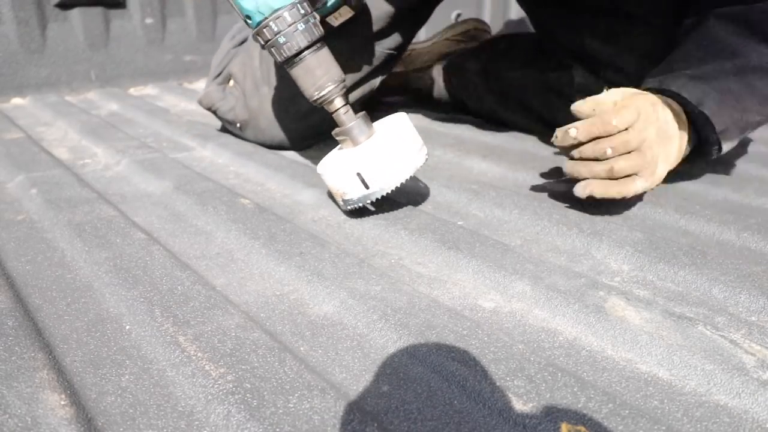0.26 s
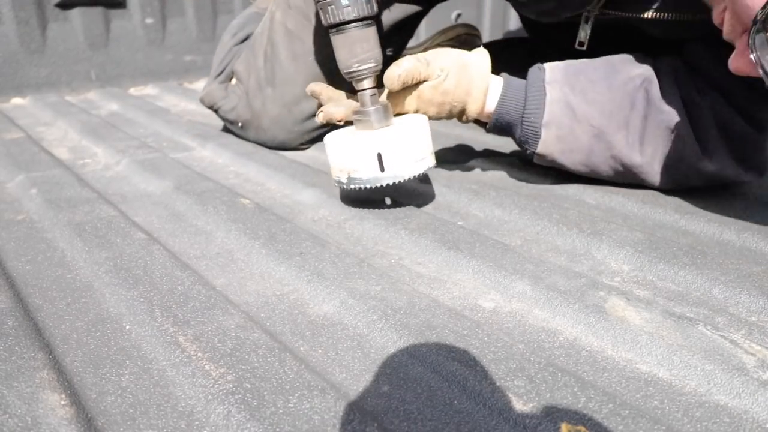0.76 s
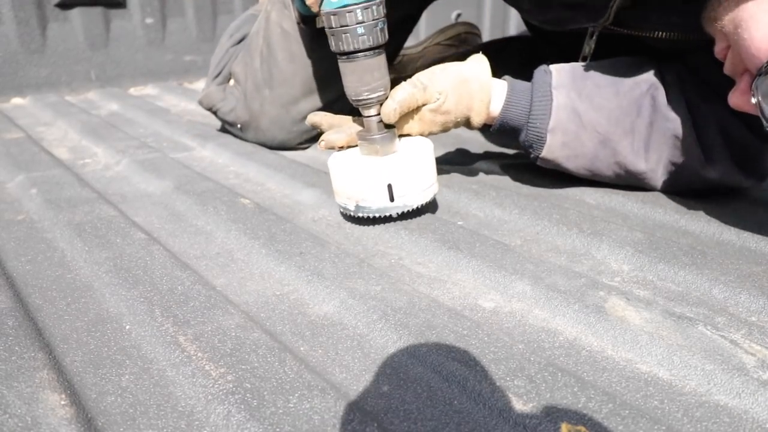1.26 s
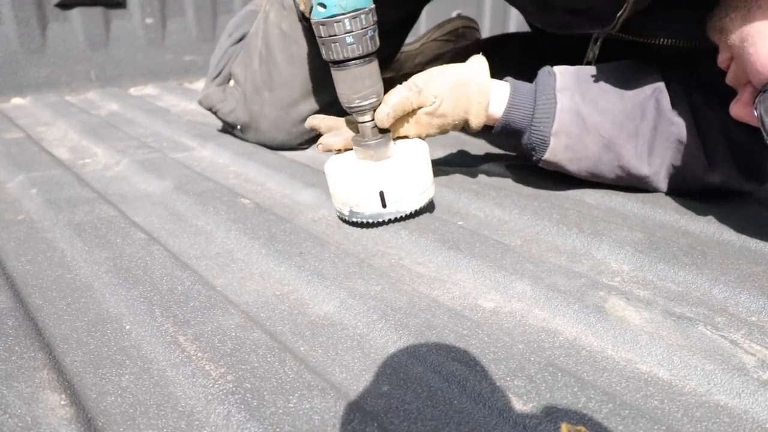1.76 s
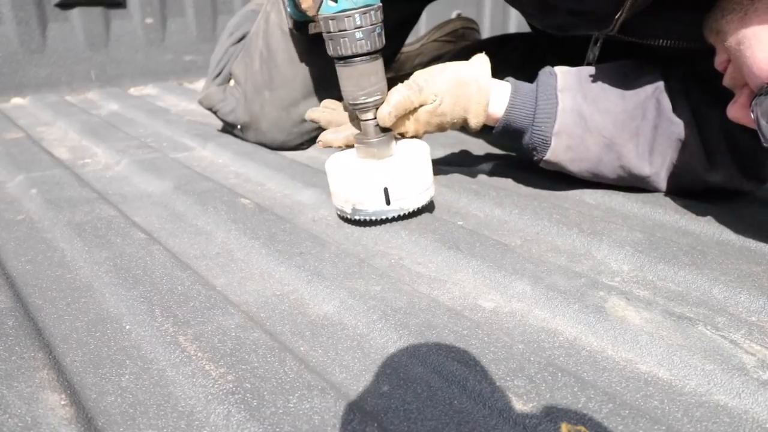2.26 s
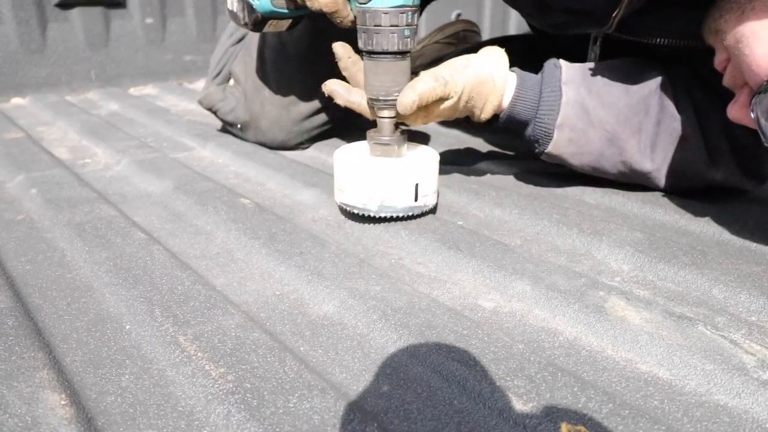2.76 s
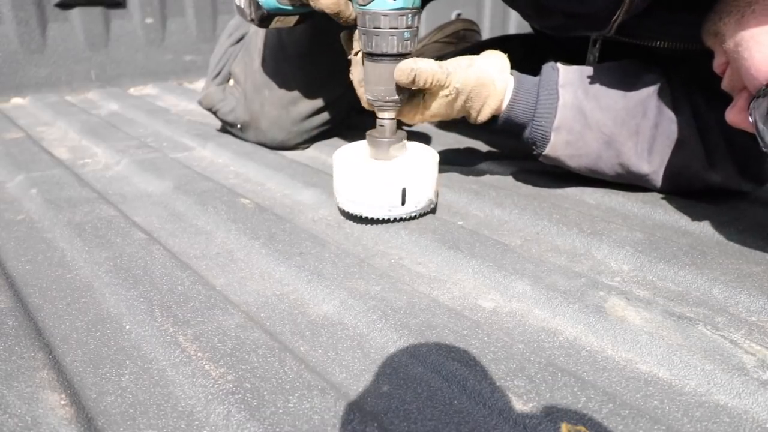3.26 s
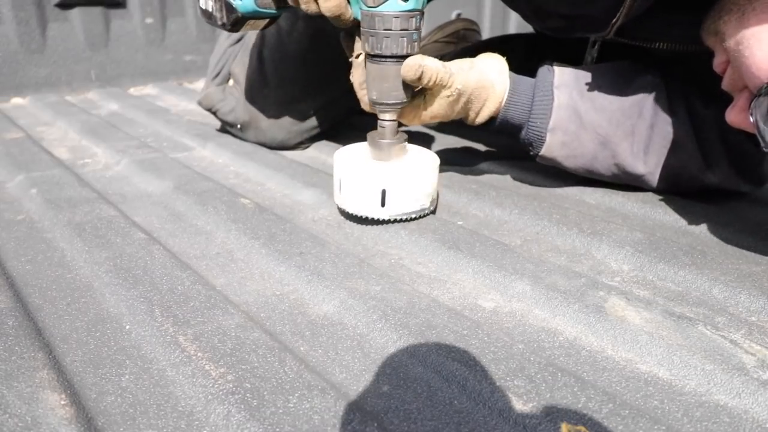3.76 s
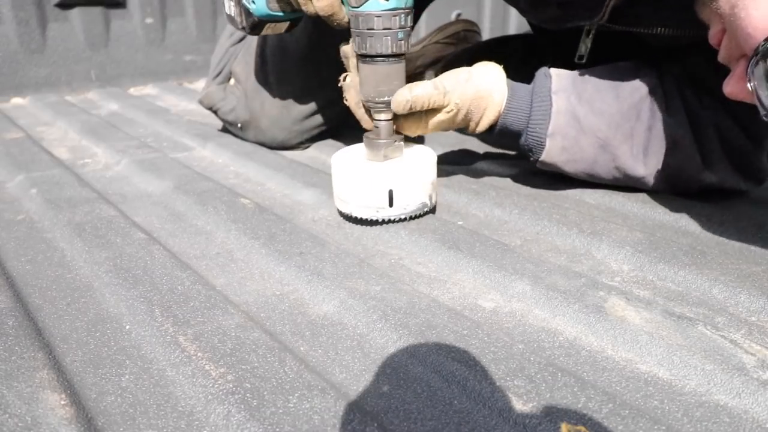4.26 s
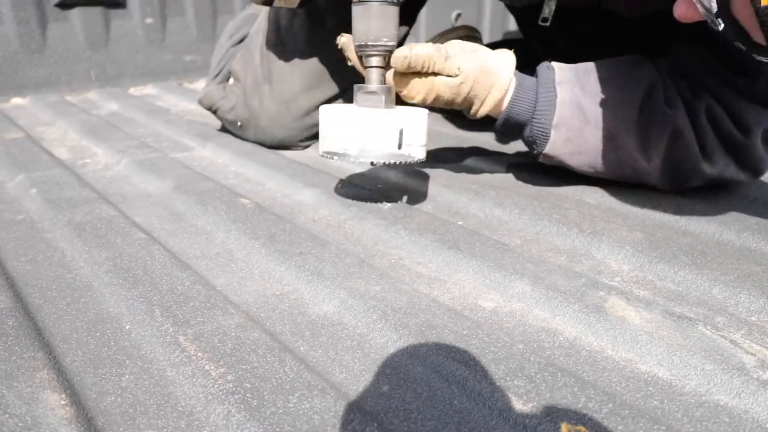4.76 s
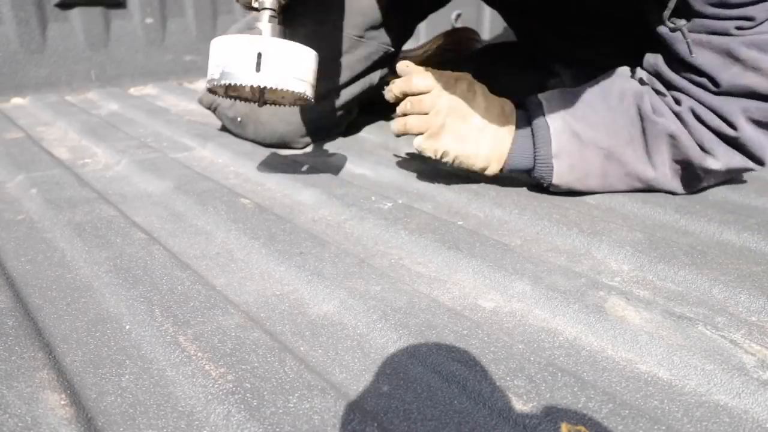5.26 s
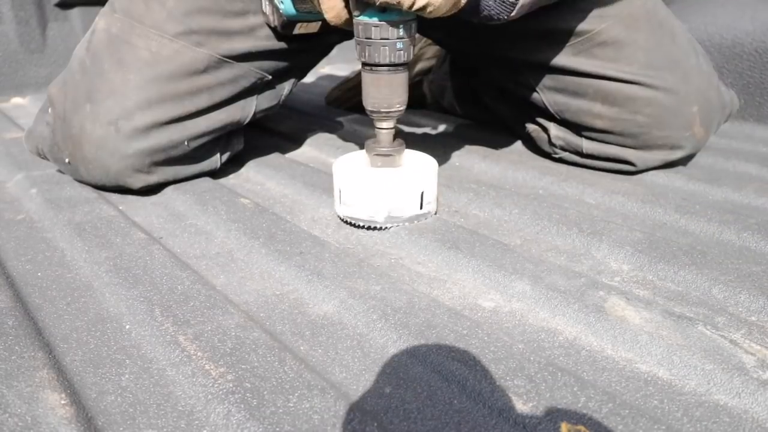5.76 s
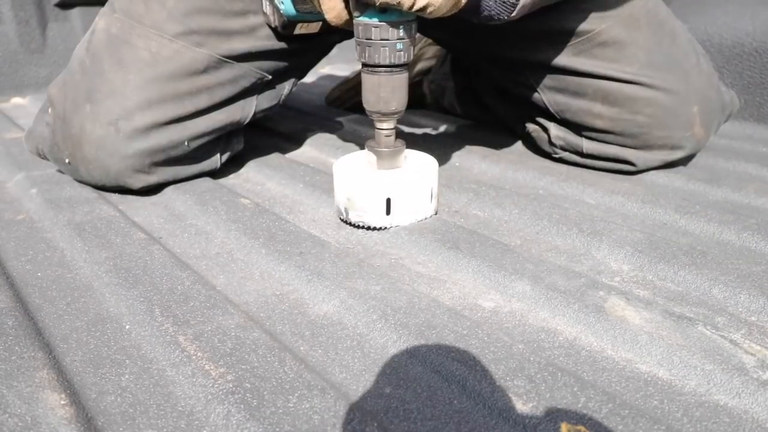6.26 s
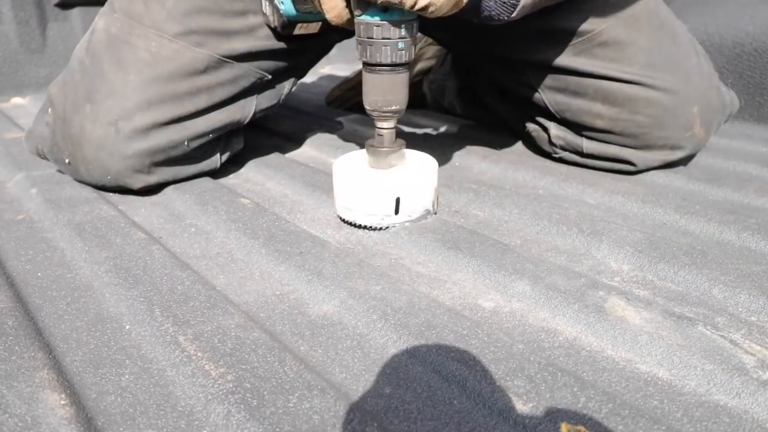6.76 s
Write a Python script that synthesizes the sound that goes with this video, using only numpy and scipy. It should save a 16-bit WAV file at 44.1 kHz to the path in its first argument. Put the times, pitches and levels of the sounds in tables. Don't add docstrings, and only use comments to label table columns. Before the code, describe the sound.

Cloth drags and knees thump on sheet metal outdoors, a drill whines in brief revs, then saw teeth scrape and drum the steel.

```python
import sys
import numpy as np
from scipy import signal
from scipy.fft import rfft, irfft
from scipy.io import wavfile
from scipy.ndimage import uniform_filter1d, minimum_filter1d

SR = 44100
rng = np.random.default_rng(int(sys.argv[2]) if len(sys.argv) > 2 else 0)


def gain_from_db(level_db):
    decades = np.asarray(level_db, float) / 20
    return 10 ** decades


def digitize_waveform(pressure):
    field = np.atleast_2d(pressure).T
    bounded = np.clip(field, -1, 1)
    quanta = np.round(bounded * 32767).astype(np.int16)
    wavfile.write(sys.argv[1], SR, quanta)


N = 308700
T = np.arange(N) / SR

# (frequency [Hz], likeness [0-1])
LIKENESS = [(60, 1), (300, 0.89), (700, 0.69), (1500, 0.28), (4000, 0.39), (9000, 0.21), (14000, 0.067)]
# (frequency [Hz], likeness [0-1])
FAR_LIKENESS = [(60, 1), (300, 0.95), (700, 0.63), (1500, 0.2), (3000, 0)]
# (frequency [Hz], difference [dB])
BALANCE = [(60, 0), (300, 0.5), (1200, -2), (4500, -1), (14000, -2.5)]

# (frequency [Hz], level [dB per Hz])
RUMBLE_COLOUR = [(15, -44), (25, -4.5), (69, -5), (200, -4.5), (273, -5), (425, -8), (578, -21.5),
                 (636, -15), (866, -22), (1180, -19.5), (2500, -30.5), (3250, -38), (5500, -120)]
# (time [s],
# level [dB])
BREEZE_LEVEL = [(0, -33.5), (.45, -30), (.62, -34), (.83, -31.5), (1.96, -32.5), (2.13, -29.5),
                (2.18, -36.5), (2.3, -36.5), (2.99, -32.5), (4.25, -29), (4.7, -30), (4.8, -45),
                (4.96, -45), (5.04, -33), (5.3, -35), (5.41, -31)]
# (frequency [Hz], level [dB per Hz])
CLOTH_COLOUR = [(880, -9), (1500, -8.5), (2080, -14.5), (2440, -12.5), (3220, -14.5), (4160, -17),
                (4870, -21.5), (8490, -20.5), (15100, -35), (16000, -27)]
# (time [s], level [dB])
CLOTH_LEVEL = [(0, -47), (.13, -49), (.5, -47), (.7, -47.5), (1.3, -52), (3, -51), (4.3, -52.5),
               (4.72, -49.5), (4.968, -55.5), (5.2, -50.5), (5.25, -42.5), (5.41, -38)]
# (time [s], peak [dB], brightness [dB], weight [dB])
CLOTH_DRAGS = [
    (0.033, -37, 5, 12),
    (0.201, -24.5, -9.5, 3),
    (0.309, -41.5, 8, -13),
    (0.365, -28.5, -8.5, 7),
    (.44, -53.5, 14.5, 1),
    (.73, -64, 7, 13),
    (3.21, -45.5, -16, 17.5),
]
# (time [s], peak [dB], pitch [Hz], time to fall 60 dB [s])
FLOOR_THUMPS = [(0.018, -8, 292, 0.12), (0.355, -1, 162, 0.037), (0.387, -4.5, 196, 0.1),
                (0.81, -2, 110, 0.023), (0.83, -14, 90, 0.034), (2.05, -13.5, 172, 0.063),
                (2.101, -2, 142, 0.014), (2.122, 11, 307, 0.013), (2.141, -4, 320, 0.016),
                (2.244, -14.5, 380, 0.058), (2.265, -6, 234, 0.024), (2.323, -17.5, 205, 0.066),
                (3.186, 1, 151, 0.026), (3.219, -6, 376, 0.045), (.003, -14, 230, .04),
                (.044, -15, 345, .05), (.432, -8, 200, 0.022), (3.567, -11.5, 151, 0.044),
                (4.385, -13, 152, 0.065), (4.498, -11, 110, 0.046), (4.542, -9.5, 323, 0.058),
                (4.644, -16, 109, .04)]
# (time [s], peak [dB], pitch [Hz], time to fall 60 dB [s])
SHEET_BOOMS = [(3.409, -10, 140, 0.055), (3.491, -11.5, 164, 0.092), (3.969, -7.5, 170, 0.042),
               (5.683, -9, 192, 0.056), (5.743, -3, 162, 0.057), (5.862, -19, 165, 0.046),
               (5.986, -6.5, 152, 0.079), (6.02, -6, 206, 0.11), (6.052, -19, 203, 0.066),
               (6.093, -10.5, 190, 0.054), (6.156, -1, 161, 0.044), (6.255, -6, 188, 0.076),
               (6.344, -3, 184, 0.12), (6.665, -15, 168, 0.058), (6.69, -9, 160, .05)]
# (time [s], peak [dB], centre [Hz], width
DRY_SNAPS = [(.004, -21, 9600, 0.9), (.0253, -20, 2200, 0.7), (0.15, -20, 3500, 2.4), (0.18, -19, 3000, 1),
             (0.3, -19.5, 4120, 0.19), (0.26, -24, 7500, 0.89), (5.443, -24, 2020, 2),
             (5.6838, -8, 1600, 1.8), (5.7434, -5, 2400, 3.4), (5.878, -12, 1500, 2.2),
             (5.925, -12, 1300, 1.8), (6.055, -21, 1500, 1.8), (6.1198, -5, 3200, 2.5),
             (6.351, -9, 2500, 3.3), (6.4036, -12, 2500, 2), (6.4924, -11, 2480, 1.5),
             (6.646, -23, 1800, 1.5), (6.7722, -10, 2500, 1.8), (6.921, -9.5, 3000, 2.4),
             (4.864, -10, 7000, .8), (4.878, -27, 4000, 2), (4.8868, 4.5, 6500, 0.17),
             (4.833, -14, 3100, .1), (5.979, -16, 2200, 1), (6.872, -12, 3000, 2.1), (6.1645, -12, 1500, 1),
             (6.712, -6, 4600, 2), (5.754, -13, 2500, 3), (5.614, -15, 2000, 2), (6.6, -14, 4000, 2),
             (4.86, -12, 3800, .3), (3.021, -21, 4900, 2), (6.5505, -5, 10500, .5), (6.548, -17, 2000, 2),
             (6.499, -13, 2000, .6), (6.676, -14, 2200, .8), (3.09, -20, 2700, .4), (4.887, -6, 9600, .3)]

# (frequency [Hz], level [dB], time to fall 60 dB [s])
CUP_HIGH_MODES = [(9430, -10, .05), (9440, 2.5, 0.053), (9760, -2, 0.033), (10040, -8, 0.052),
                  (11000, 0.5, 0.027), (11500, 0.5, 0.024), (12300, -11, .035), (12250, -4, 0.039)]
# (frequency [Hz], level [dB], time to fall 60 dB [s])
CUP_MID_MODES = [(6080, -14, .02), (7030, 0, .022), (7130, -4, .05), (7840, -15, .03)]
# (frequency [Hz], level [dB], time to fall 60 dB [s])
CUP_LOW_MODES = [(1400, -8, .012), (2150, -8, .01), (2660, 0, .011), (3345, -4, .015), (4050, -7, .012),
                 (4620, -16, .03)]
# (time [s], peak [dB], middle modes [dB], low modes [dB], upper rim modes [dB])
CHUCK_CLACKS = [(3.021, -46, 26, 11, 0), (3.0897, -19, 4.5, 11.5, -2), (4.1746, -18, 6.5, 7, -2),
                (4.35, -39, 6, 17, 0), (4.5319, -13.5, -10, 8, -5), (4.5366, -12, 1.5, -15, 0),
                (4.573, -39.5, 0, 18, 0), (4.588, -33.5, 5, 7, -3), (4.605, -44, 6, 12, 0),
                (4.639, -55, 21, -6, 0), (4.7485, 3, -11, -20, 13), (4.8586, -4.5, -5, -3.5, 4),
                (4.8864, 3, -3, -25, 2), (4.936, -36, 2, 13, 0), (5.0314, -43.5, -2, 15, 2)]
# (time [s], peak [dB], middle modes [dB], upper rim modes [dB])
CUP_CHATTER = [(5.415, -15, 2, -5), (5.682, -31, -4, 0), (5.8671, -29, 1, 0), (5.883, -9, -7, 0),
               (5.924, -18, 1, 0), (5.9633, -16, -5, 0), (6.052, -18, -9, 0), (6.062, -8, -13, 3),
               (6.1195, -3.5, -5, 1), (6.1409, -0.5, -10, -3), (6.1642, 6.5, -13.5, 11),
               (6.2008, -7, -15, 7), (6.352, -15, 5, 0), (6.378, -4.5, -15, 6), (6.4, -9, -15, 0),
               (6.471, -6, -8, 7), (6.505, -9, 1, -3), (6.513, -2, -18, -4), (6.5224, -4, -18, -8),
               (6.5474, 8, -12, 1), (6.606, -5.5, -18, 0), (6.6727, -28, -3, 0), (6.688, -12, -10, 0),
               (6.712, 9, -14, 3), (6.794, -1.5, -10, 5), (6.8104, -13, -14, 2), (6.8834, 0.5, -7.5, 4),
               (6.894, -13, -8, 0), (6.9214, -7.5, -14, -3)]

# (time [s], scrape level [dB])
PRESSURE = [
    (5.411, -25),
    (5.466, -22.5),
    (5.898, -26),
    (6.068, -24.5),
    (6.514, -26.5),
    (6.616, -25.5),
    (6.744, -27),
    (6.86, -33.5),
    (7.0, -33),
]
# (time [s], peak [dB])
TOOTH_GRABS = [(5.441, -8), (5.612, -7), (5.64, -0.5), (5.684, 6.5), (5.742, -11), (5.768, 0), (5.873, 5),
               (5.924, 0), (5.972, -12), (6.056, 2), (6.163, 1.5), (6.254, 3.5), (6.331, -6), (6.369, 2),
               (6.491, -27), (6.624, -21), (6.688, -3), (6.788, 1.5), (6.86, -5), (6.977, -10)]
# (frequency [Hz], level [dB per Hz])
DRUM_COLOUR = [(15, -54), (25, -68), (54, 8), (114, -1), (189, 3), (255, -3.5), (383, -6.5), (452, 2.5),
               (752, -27), (900, -5.5), (1170, -67), (1980, -120)]
# (frequency [Hz], width [Hz], boost [dB])
DRUM_PEAKS = [(64, 37, -2.5), (153.5, 10, 4), (201, 13.7, 10), (333, 7, 10), (439.7, 17.4, 8.5),
              (547.4, 18, 19), (629, 16, 22)]
# (frequency [Hz], level [dB per Hz])
SCRAPE_COLOUR = [(350, -4), (600, -12), (636, -3.5), (752, -5), (1060, -7), (1550, -1), (2070, -13.5),
                 (2800, -19), (3640, -51), (6160, -120)]
# (frequency [Hz], width [Hz], boost [dB])
SCRAPE_PEAKS = [(1053, 40, 14.5), (1250, 69, 6.5), (1420, 30, 6), (1584, 22, 8.5), (1844, 98, 5.5)]
# (frequency [Hz], level [dB per Hz])
LOADED_COLOUR = [(1180, -36), (2000, -4.5), (3520, -6.5), (4650, -12.5), (6140, -10.5), (8630, -14),
                 (9830, -12), (14200, -22.5), (16000, -29)]
# (frequency [Hz], width [Hz], boost [dB])
LOADED_PEAKS = [(3700, 690, 5), (6230, 410, 7), (7700, 290, 7), (9540, 470, 3.5)]
# (time [s], gear mesh [Hz])
LOADED_MESH = [(5.41, 2975), (5.6, 2990), (5.66, 2900), (5.72, 2860), (5.96, 2870), (6.1, 2820),
               (6.2, 2880), (6.32, 2890), (6.36, 3050), (6.37, 2980), (6.5, 2960), (6.56, 2880),
               (6.67, 2890), (6.75, 2840), (7, 2870)]
# (time [s], drop in mesh [Hz])
SPEED_SAGS = [(5.3, 0), (5.93, 90), (6.0, 30), (6.11, 80), (6.365, 230), (6.404, 220), (6.44, 200),
              (6.465, 90), (6.505, 210), (6.68, 180), (6.815, 70), (6.92, 60)]

# (time [s], motor level [dB])
TRIGGER_SQUEEZES = [
    [(3.021, -29), (3.15, -28), (3.29, -27.5), (3.39, -24.5), (3.71, -28), (3.8, -26), (3.84, -23.5),
     (3.98, -23.5)],
    [(3.981, -23), (4.04, -18), (4.12, -22), (4.168, -25.5), (4.195, -42)],
    [(4.35, -33), (4.47, -25), (4.53, -31.5)],
    [(4.735, -31), (4.75, -17), (4.78, -13.5), (4.84, -20.5), (4.858, -28), (4.868, -38), (4.886, -37)],
]
# (time [s], gear mesh [Hz])
SQUEEZE_MESH = [
    [(3.02, 700), (3.1, 1450), (3.2, 1730), (3.29, 1750), (3.39, 1935), (3.47, 1860), (3.55, 1570),
     (3.63, 1230), (3.8, 1070)],
    [(3.83, 1460), (3.99, 1420), (4.03, 2150), (4.06, 2720), (4.11, 3010), (4.18, 2700)],
    [(4.35, 600), (4.41, 1250), (4.45, 1580), (4.54, 1750)],
    [(4.735, 2100), (4.775, 2680), (4.79, 2770), (4.85, 2540), (4.872, 2450)],
]
# (time [s], whine level [dB])
GEAR_TORQUE = [(3.02, -6), (3.28, -5), (3.36, 1), (3.63, 4), (3.72, -1), (3.81, -4), (3.86, 0), (3.99, 0),
               (4.025, -6), (4.06, 1), (4.18, 0), (4.35, 0), (4.5, 2), (4.735, -9), (4.785, 0), (4.87, -3)]
# (multiple of the mesh [ratio], level [dB])
GEAR_ORDERS = [(1, -3), (2.035, -4), (3.06, -11), (.5, -6), (1.555, -10), (1.96, -7), (2.55, -8),
               (1.69, -10), (3.54, -10), (4.05, -9), (1.37, -10), (1.49, -9), (2.3, -9), (2.8, -8)]
# (frequency [Hz], gain [dB])
WHINE_COLOUR = [(500, -4), (1000, -2), (1250, 4), (1500, 1), (1900, 2), (2250, 7), (3000, 8), (4400, 4),
                (5200, 5), (5700, 5), (6200, 5), (6900, -5), (8500, -3), (10000, -14)]
# (frequency [Hz], level [dB per Hz])
MOTOR_COLOUR = [(410, -63), (700, -9.5), (2300, -5), (3200, 0.5), (3600, -5), (4430, 0.5), (5060, -11),
                (5990, 2.5), (6920, -7), (8420, -4), (16000, -26.5)]
# (frequency [Hz], width [Hz], boost [dB])
HOUSING_PEAKS = [(3175, 200, 8.5), (3950, 92, 7.5), (3970, 110, -2), (5920, 200, 4.5), (7900, 300, 5),
                 (8950, 140, -3)]


def evened(x):
    return x / np.sqrt(np.mean(x ** 2) + 1e-20)


def read(points, hz):
    f, value = np.transpose(points)
    return np.interp(np.log(hz + 1), np.log(f + 1), value)


def column(rows, index, edge_s=0.0025):
    rows = np.array(rows)
    inside_s = np.minimum(T - rows[0, 0], rows[-1, 0] - T)
    gate = np.clip(inside_s / edge_s + 1, 0, 1)
    return np.interp(T, rows[:, 0], rows[:, index]), gate


def level(rows, edge_s=0.00049):
    db, gate = column(rows, 1, edge_s)
    return gain_from_db(db) * gate


def within(span_s):
    return slice(round(span_s[0] * SR), min(round(span_s[1] * SR), N))


def place(out, time_s, sound):
    spot = out[..., round(time_s * SR):][..., :sound.shape[-1]]
    spot += sound[..., :spot.shape[-1]]


def bumps(colour, peaks, hz):
    return read(colour, hz) + sum(db / (1 + (2 * (hz - f) / width) ** 2) for f, width, db in peaks)


def hiss(colour, peaks, lo_hz, hi_hz, patchy_db, flicker_db, likeness, part=slice(0, N), size=512):
    hop, length = size // 4, part.stop - part.start
    hz = np.fft.rfftfreq(size, 1 / SR)
    a, b, c, d, patches = rng.standard_normal((length // hop + 5, len(hz), 5)).T
    patches = evened(uniform_filter1d(uniform_filter1d(patches, 6, 0), 10, 1))
    flicker = uniform_filter1d(rng.exponential(1, a.shape[1]) - 1, 3)
    flicker = np.minimum(evened(flicker), 2)
    same = np.clip(read(likeness, hz), 0, .9)[:, None]
    left = a + 1j * b
    right = same * left + np.sqrt(1 - same ** 2) * (c + 1j * d)
    right = right * gain_from_db(-read(BALANCE, hz))[:, None]
    shape_db = bumps(colour, peaks, hz)[:, None] + patchy_db * patches + flicker_db * flicker
    z = np.array([left, right]) * gain_from_db(shape_db)
    band = (hz >= lo_hz) & (hz <= hi_hz)
    band_power = np.mean(abs(z.mean(0)[band]) ** 2, 1).sum()
    in_band = band_power / np.mean(abs(z) ** 2, (0, 2)).sum()
    noise = signal.istft(z, nperseg=size, noverlap=size - hop)[1][:, :length]
    out = np.zeros((2, N))
    out[:, part] = evened(noise) / np.sqrt(in_band)
    return out


def tone(hz, wobble_hz, swell_db=-3.0):
    slow = uniform_filter1d(uniform_filter1d(rng.standard_normal((2, len(hz))), 300), 300)
    drift, swell = evened(slow[0]), evened(slow[1])
    phase = 2 * np.pi * np.cumsum(hz + wobble_hz * drift) / SR
    return np.sqrt(2) * gain_from_db(swell_db * swell) * np.sin(phase)


def motor_effort():
    return np.max([level(squeeze) for squeeze in TRIGGER_SQUEEZES], 0)


def thumps():
    out, t = np.zeros(N), np.arange(3000) / SR
    for s, db, hz, t60 in FLOOR_THUMPS + SHEET_BOOMS:
        push = np.sin(2 * np.pi * hz * t)
        push = push + 0.97 * np.sin(2 * np.pi * 1.83 * hz * t) * np.exp(-t / 0.007)
        place(out, s, gain_from_db(db - 60 * t / t60) * push * np.minimum(t / 0.0049, 1))
    return np.array([out, 0.58 * out + 0.34 * np.roll(out, 40)])


def surroundings():
    breeze_db, outside = column(BREEZE_LEVEL, 1, 0.051)
    rise_s, fall_s = 0.028, 0.028
    strokes = [gain_from_db(db) * np.exp(np.minimum((T - s) / rise_s, (s - T) / fall_s)) for s, db, _, _ in CLOTH_DRAGS]
    bright = sum(stroke * gain_from_db(row[2]) for stroke, row in zip(strokes, CLOTH_DRAGS))
    weight = sum(stroke * gain_from_db(row[3]) for stroke, row in zip(strokes, CLOTH_DRAGS))
    shake = motor_effort()

    low_colour = [(f, db) for f, db in RUMBLE_COLOUR if f < 600] + [(900, -63)]
    low = hiss(low_colour, [], 50, 500, 2.37, 0.41, FAR_LIKENESS, size=1024)
    low = low * np.hypot(gain_from_db(breeze_db) * outside + weight, gain_from_db(-16) * shake)
    calm = column([[2.16], [3.07]], 0, 0.018)[1]
    gusts = signal.sosfiltfilt(signal.butter(2, 90, fs=SR, output="sos"), low)
    low = low - 0.87 * calm * gusts

    mid_colour = [(300, -20.5)] + [(f, db) for f, db in RUMBLE_COLOUR if f > 450] + [(4000, -70.0)]
    scuff = gain_from_db(-47 + 0.46 * (breeze_db + 35.0)) * outside
    mid = hiss(mid_colour, [], 900, 2000, 1.5, 0.29, FAR_LIKENESS)
    mid = mid * (scuff + sum(strokes) + gain_from_db(-48) * shake)

    cloth = hiss(CLOTH_COLOUR, [], 2000, 13000, 1.2, 0.33, FAR_LIKENESS, size=256)
    cloth = cloth * (level(CLOTH_LEVEL, 0.02) + bright)
    return low + mid + cloth + thumps()


def snaps():
    out, t = np.zeros((2, N)), np.arange(1500) / SR
    for s, db, hz, octaves in DRY_SNAPS:
        a, b = rng.standard_normal((2, 1500))
        edges = np.clip(hz * 2 ** (np.array([-.5, .5]) * abs(octaves)), 100, 15000)
        noise = np.array([a, 1.4 * a + 0.98 * b]) * np.exp(-t / 0.0034)
        burst = signal.lfilter(*signal.butter(2, edges, "band", fs=SR), noise)
        place(out, s, gain_from_db(db) * burst / abs(burst).max())
    return out


def ring(modes, t, luck, turn):
    out = 0
    for (f, db, t60), g, a in zip(modes, luck, turn):
        fade = gain_from_db(db + 0.65 * g - 60 * t / t60)
        beating = np.cos(2 * np.pi * 0.0078 * f * a * t)
        port_phase = np.array([[0], [a + f / 9000]])
        out = out + fade * beating * np.sin(2 * np.pi * f * (1 + 0.0052 * g) * t + port_phase)
    return out


def knocks(rows, crack_db, echo_s, echo, width, pan_db, rattle_s, fizz_db, damp):
    out, t = np.zeros((2, N)), np.arange(2500) / SR
    edge = signal.butter(3, [1500, 12500], "band", fs=SR)
    rim = signal.butter(4, [8900, 12900], "band", fs=SR)
    delay = round(echo_s * SR)
    for s, db, mid_db, low_db, rim_db in rows:
        upper = [(f, d + rim_db * (f > 10500), t60 * damp) for f, d, t60 in CUP_HIGH_MODES]
        luck, hits = rng.standard_normal((6, 8)), rng.standard_normal(800)
        hits = hits * np.exp(-t[:800] / max(rattle_s, .0003)) * np.minimum(t[:800] / 0.00017, 1)
        hits[delay:] += echo * hits[:-delay]
        parts = []
        for modes, g, a in zip((upper, CUP_MID_MODES, CUP_LOW_MODES), luck, luck[3:]):
            part = signal.fftconvolve(hits[None], ring(modes, t, g, width * a), axes=1)
            parts.append(part / abs(part).max())
        high, mid, low = parts
        sound = high * gain_from_db([[-1.5], [1.5]]) + gain_from_db(mid_db) * mid + gain_from_db(low_db) * low
        crack = signal.lfilter(*edge, hits)
        sound[:, :800] += gain_from_db(crack_db + max(mid_db, low_db, 0)) * crack / abs(crack).max()
        fizz = signal.lfilter(*rim, [hits, np.roll(hits, 2)])
        sound[:, :800] += gain_from_db(fizz_db + np.array([[-2.5], [2.5]])) * fizz / abs(fizz).max()
        place(out, s, gain_from_db(db) * sound * gain_from_db([[pan_db / 2], [-pan_db / 2]]))
    return out


def steel_knocks():
    chuck = knocks(CHUCK_CLACKS, -7.5, 0.006, 0.3, 0.96, -1.7, 0.0027, fizz_db=-22, damp=0.91)
    seat_db = -40
    rows = [(s, db, mid_db, seat_db, rim_db) for s, db, mid_db, rim_db in CUP_CHATTER]
    cup = knocks(rows, -40, 0.0037, 0.15, 2.23, -1.5, 0.001, fizz_db=-6.5, damp=1.0)
    return signal.sosfilt(signal.butter(4, 13600, fs=SR, output="sos"), chuck + cup)


def teeth():
    teeth_per_s, fade_s = 260, 0.001
    catch = np.minimum(rng.exponential(1, N), 2) * (rng.random(N) < teeth_per_s / SR)
    jumps = signal.lfilter([1], [1, -np.exp(-1 / (fade_s * SR))], catch)
    return evened(1 + 0.24 * evened(jumps))


def loaded_whine(since, press_db):
    jolts, sag_hz = np.transpose(SPEED_SAGS)
    last = np.maximum(np.searchsorted(jolts, T) - 1, 0)
    mesh, turning = column(LOADED_MESH, 1, 0.0055)
    mesh = mesh - sag_hz[last] * np.exp(-abs(T - jolts[last]) / .03)
    entering = 0.44 + gain_from_db(2) * np.exp(-((since - .15) / .13) ** 2)
    fast_stage = tone(mesh, 12, swell_db=1.5) * gain_from_db(3.5 * np.exp(-since / .4))
    slow_stage = entering * tone(.53 * mesh, 4)
    gears = (fast_stage + slow_stage) * gain_from_db(-33.5) * turning
    panel = gain_from_db(-32 + press_db) * turning * tone(331 + 0 * T, 3, swell_db=3)
    return (gears + panel) * gain_from_db([[-.6], [.6]])


def cutting():
    grabs, t = np.zeros(N), np.arange(3000) / SR
    for s, db in TOOTH_GRABS:
        place(grabs, s, gain_from_db(db - 18.0) * np.exp(-t / 0.03) * np.minimum(t / 0.00085, 1))
    part = within((5.3, 7))
    feed_db, on = column(PRESSURE, 1, 0.0053)
    press_db = feed_db + 26.5
    since = np.maximum(T - PRESSURE[0][0], 0)

    booming = gain_from_db(-23 + 0.34 * press_db) * np.minimum(since / 0.053, 1)
    drum = hiss(DRUM_COLOUR, DRUM_PEAKS, 50, 700, 1.9, 0.28, LIKENESS, part, size=2048)
    drum = drum * (booming + uniform_filter1d(grabs, 300))

    scrape = hiss(SCRAPE_COLOUR, SCRAPE_PEAKS, 800, 2200, 2.25, 0.62, LIKENESS, part, size=1024)
    scrape = scrape * teeth() * (gain_from_db(feed_db) * on + 0.29 * grabs)

    motor = hiss(LOADED_COLOUR, LOADED_PEAKS, 3280, 7440, 1.6, 1.55, LIKENESS, part)
    stutter = np.minimum(rng.exponential(1, N // 100 + 1), 3).repeat(100)[:N]
    motor = motor * (gain_from_db(-29.5 + 0.54 * press_db) * on + 0.066 * grabs * stutter)
    return drum + scrape + motor + loaded_whine(since, press_db)


def shaft_flaws(mesh):
    teeth_per_turn = 25.6
    sizes = np.sqrt(rng.exponential(1, 160)) * np.exp(2j * np.pi * rng.random((2, 160)))
    pattern = irfft([sizes[0], .6 * sizes[0] + .8 * sizes[1]], 4096)
    angle = np.cumsum(mesh / teeth_per_turn) / SR % 1
    comb = pattern[:, (angle * 4096).astype(int)] * np.sqrt(mesh)
    housing_db = bumps(MOTOR_COLOUR, HOUSING_PEAKS, np.fft.rfftfreq(len(mesh), 1 / SR))
    return evened(irfft(rfft(comb) * gain_from_db(housing_db), len(mesh)))


def motor_bursts():
    part, out = within((3, 4.9)), np.zeros((2, N))
    effort = motor_effort()[part]
    mesh = column(sum(SQUEEZE_MESH, []), 1)[0][part]
    duty = mesh / 3100

    whine = sum(gain_from_db(db + read(WHINE_COLOUR, k * mesh)) * tone(k * mesh, 6 * k, swell_db=3.)
                for k, db in GEAR_ORDERS)
    whine_db = -13 + 4 * np.log2(duty) + column(GEAR_TORQUE, 1)[0][part]

    switch_hz, side = 8161, mesh / 5.13
    switch = tone(switch_hz + side, 5)
    switch = switch + gain_from_db(-.5) * tone(switch_hz - side, 5)
    switch = switch + gain_from_db(-5) * tone(switch_hz + 0 * side, 2)
    chopping = gain_from_db(-40.5) * 4 * duty * (1 - duty) * (effort > 0)

    body = hiss(MOTOR_COLOUR, HOUSING_PEAKS, 2200, 12000, 0.77, 1.0, LIKENESS, part, size=1024)[:, part]
    body = body + gain_from_db(2) * shaft_flaws(mesh)
    roar = signal.sosfilt(signal.butter(2, (5600, 6450), "band", fs=SR, output="sos"), body)
    body = body + duty ** 3 * roar

    out[:, part] = (gain_from_db(-3.5) * body + whine * gain_from_db(whine_db)) * effort + switch * chopping
    after = np.maximum(T - TRIGGER_SQUEEZES[1][-2][0], 0)
    return out + gain_from_db(-33 - 500 * after) * np.sin(2 * np.pi * 3343 * after)


def scene():
    return surroundings() + snaps() + steel_knocks() + cutting() + motor_bursts()


def band_limit(x):
    return signal.sosfilt(signal.butter(12, 15950, fs=SR, output="sos"), x)


def record(dry):
    dry = signal.sosfilt(signal.butter(2, 48, "high", fs=SR, output="sos"), dry)
    power = uniform_filter1d((dry ** 2).max(0), 60, origin=29)
    peak_db = 10 * np.log10(abs(power) + 1e-12)
    climb = T * 159.0
    held_db = np.maximum.accumulate(peak_db + climb) - climb
    over_db = np.maximum(held_db + 13.0, 0)
    smooth = np.exp(-1 / (0.016 * SR))
    ducked = dry / gain_from_db(0.97 * signal.lfilter([1 - smooth], [1, -smooth], over_db))
    excess = np.maximum(abs(ducked).max(0) / 1.05, 1)
    ceiling = uniform_filter1d(-minimum_filter1d(-excess, size=61), size=41)
    limited = np.clip(ducked / ceiling, -1, 1)
    treble_cut = signal.firwin(255, 16100, fs=SR)[None]
    mix = signal.oaconvolve(limited, treble_cut, "same", axes=1)
    return band_limit(mix)


dry = scene()
out = record(dry)
digitize_waveform(out)
```